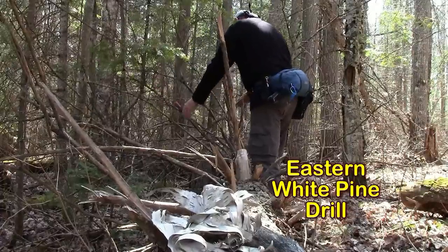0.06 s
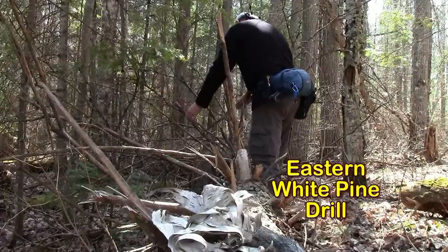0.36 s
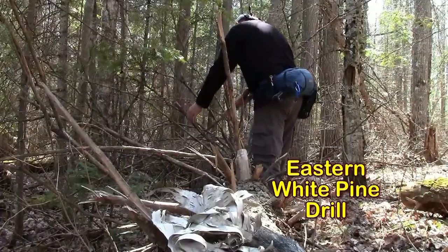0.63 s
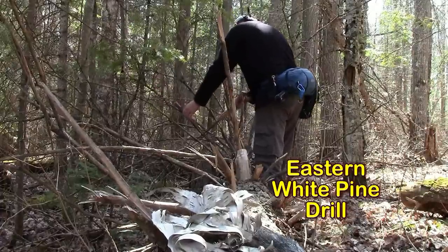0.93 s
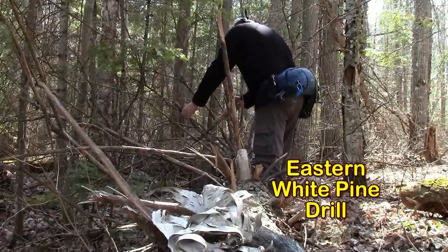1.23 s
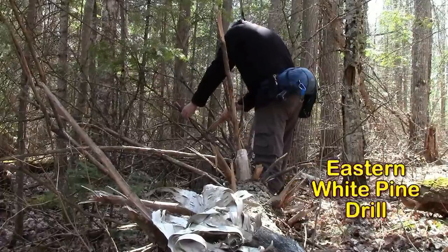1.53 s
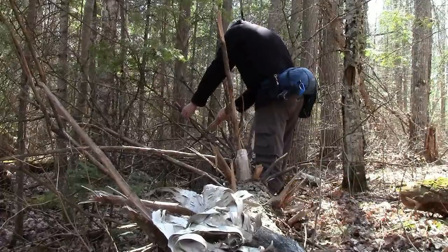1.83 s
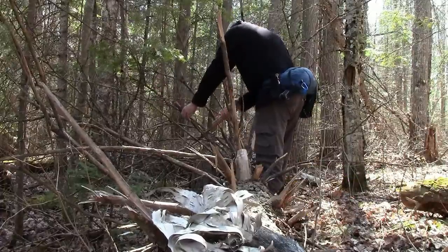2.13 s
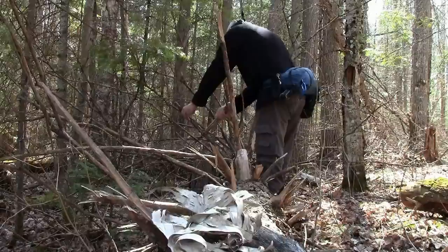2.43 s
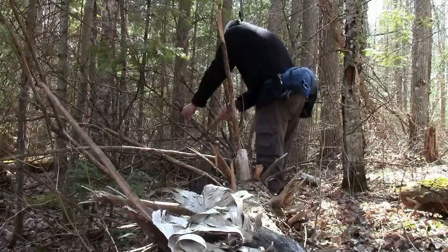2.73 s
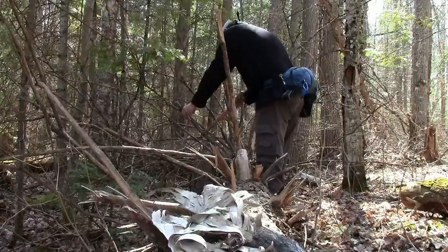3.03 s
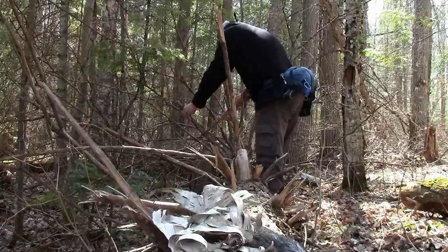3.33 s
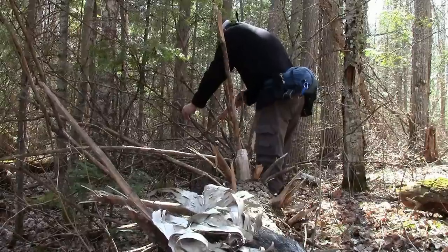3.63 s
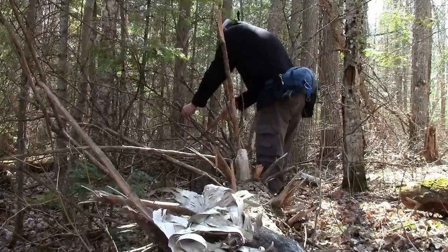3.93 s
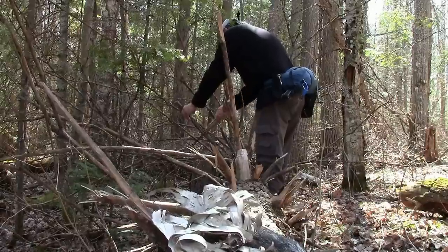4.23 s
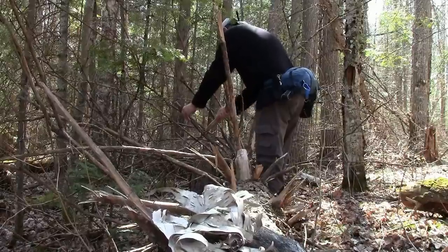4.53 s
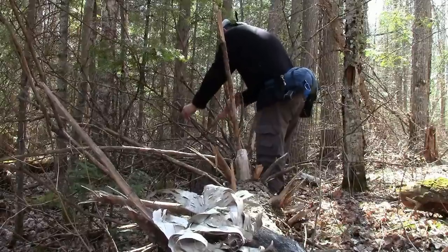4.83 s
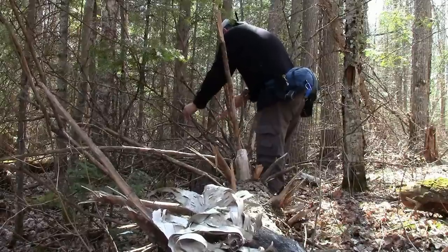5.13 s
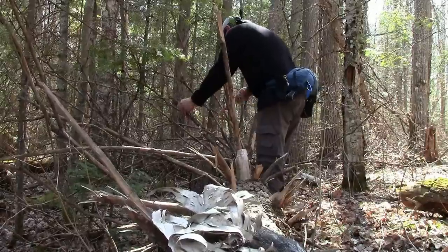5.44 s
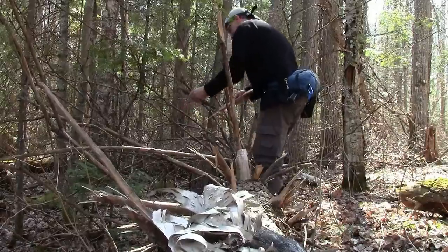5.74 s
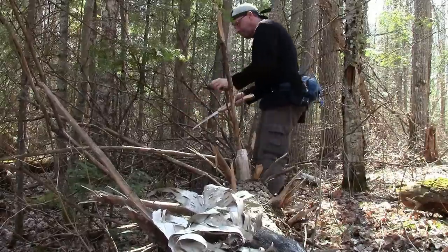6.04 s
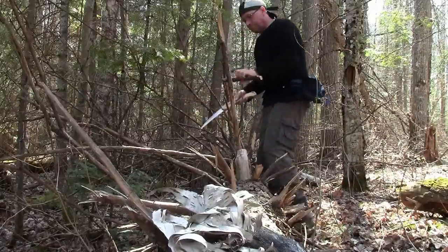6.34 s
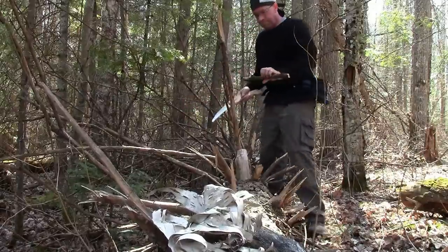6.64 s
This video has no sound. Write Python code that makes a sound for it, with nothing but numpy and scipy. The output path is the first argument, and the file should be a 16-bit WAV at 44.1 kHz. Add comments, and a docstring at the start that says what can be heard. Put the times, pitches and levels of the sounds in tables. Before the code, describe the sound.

In a quiet forest, dry twigs snap and leaves stir as a blade nudges along bark. A hand saw then cuts a dead branch in quick, rasping pulls and pushes that make the wood drum. The last fibres crack sharply and the branch comes off, followed by swishing clothes. It is heard from a few steps away, over a faint hiss and a low breeze on the microphone.

```python
"""A hand saw cuts a dead pine branch in a quiet forest. Its teeth tear the wood in quick pulls and
pushes, which rasp and make the branch drum, until the last fibres crack and the branch comes off.
Before the cut, dry twigs snap and leaves stir as the blade is set in place. Afterwards, clothes
swish as the sawyer straightens up. A faint hiss and a low breeze lie under it all."""
import sys
import numpy as np
from scipy import signal
from scipy.fft import rfft, irfft
from scipy.io import wavfile
from scipy.ndimage import uniform_filter1d

SR = 44100
rng = np.random.default_rng(int(sys.argv[2]) if len(sys.argv) > 2 else 0)


def dump_mix(stems):
    """Bounce the given channels to the path in sys.argv[1] as a 16-bit WAV at rate SR."""
    frames = np.atleast_2d(stems).T  # one column per channel
    limited = np.clip(frames, -1, 1)  # hard clip at full scale
    pcm = np.round(limited * 32767).astype(np.int16)
    wavfile.write(sys.argv[1], SR, pcm)


N = 302967

# Tone of the forest hiss and of the breeze: frequency_hz, level_db
HISS_COLOUR = [(59, -25), (100, 4), (350, 0), (471, 1.5), (1030, -5), (2930, -8.5), (3940, -32),
               (13800, -14), (16000, -27)]
BREEZE_COLOUR = [(8,-24),(22,-4.5),(35,-8.5),(55,-15.5),(90,-28),(160,-47),(400,-58)]
# Gusts on the microphone: loudest_at_s, rise_s, fall_s, level_db
GUSTS = [(.85, .3, 0.31, -40), (2.15, 0.12, 0.76, -43.5), (3.5, .25, 0.71, -41), (4.43, 0.053, 0.17, -44),
         (5.3, .25, 0.26, -39), (6.08, 0.087, 0.064, -46)]
# Dry twigs snapping: start_s, level_db, pitch_hz, fade_s
TWIGS = [(0.017, -16, 1790, 0.05), (0.123, -21, 4250, 0.059), (0.136, -22, 1576, 0.081),
         (0.237, -25, 1330, 0.026), (0.291, -24.5, 1595, 0.059), (0.313, -25, 2240, 0.033),
         (0.472, -32.5, 1430, 0.036), (0.523, -30.5, 1750, 0.024), (0.56, -30, 2630, 0.031),
         (0.644, -30, 4500, 0.055), (0.666, -24, 2450, 0.021), (0.777, -28, 1620, 0.027),
         (0.784, -23, 3380, 0.028), (0.882, -22, 4200, 0.022), (0.935, -22.5, 3430, 0.035),
         (0.982, -24, 3600, 0.054), (0.99, -21.5, 1950, 0.026), (1.018, -22, 4100, 0.069),
         (1.025, -12.5, 2780, 0.016), (1.155, -17, 2026, 0.05), (1.336, -12.5, 1930, 0.06),
         (1.414, -25, 3660, 0.038), (1.424, -24, 1860, 0.025), (1.508, -29.5, 1680, 0.06),
         (1.697, -33, 2900, 0.13), (1.738, -30.5, 4030, 0.016), (1.801, -31, 2740, 0.043),
         (2.005, -11.5, 1960, 0.066), (2.013, -6.5, 3680, 0.01), (5.484, -18, 1560, 0.047),
         (5.638, -20, 2670, 0.022), (5.647, -19.5, 3830, 0.013), (5.718, -30, 1397, 0.032),
         (5.996, -25, 2080, 0.018), (6.6, -26.5, 3930, 0.036)]
# Dull knocks of wood, hand and boot: start_s, level_db, pitch_hz, fade_s
KNOCKS = [(.02,-23,980,0.048),(.045,-26,784,0.025),(.128,-31,466,0.098),(.172,-33,317,0.11),(.245,-26,560,0.027),(2.203,-17.5,230,0.046),(5.438,-18,495,0.055),(6.1224,-18,1495,0.0065)]
# Teeth snagging and fibres breaking: start_s, level_db, pitch_hz, fade_s
CRACKS = [(2.183,-27,2950,0.022),(2.594,-12,4440,0.027),(2.7232,-2.5,2620,0.0068),(3.0593,-1.5,3070,0.014),(3.315,-14.5,2447,0.028),(3.683,-23,2980,.012),(3.695,-15,3430,0.015),(4.023,-32,2790,0.017),(4.374,-16.5,2980,0.018),(4.4595,2.5,3580,0.011),(4.468,-11,2647,0.01),(4.742,-33,2360,0.017),(4.8205,4.5,5056,0.0056),(4.9046,-15,4060,.012),(4.923,-8,4733,0.0059),(5.078,-9,1797,.02),(5.0855,6,2650,0.023),(5.2,3,3020,0.012),(5.2325,-0.5,1700,0.021),(5.239,5,1147,0.035),(5.2485,-2.5,2280,0.013),(5.2763,-5,2650,0.0047),(5.43,-4.5,1185,0.027),(5.442,-2,1158,0.031),(5.5455,-3.5,3640,0.017)]
# Tone of twigs, knocks, cracks and rustling: frequency_hz, level_db
TWIG_COLOUR = [(100,-40),(650,-6),(1150,4),(1800,4.5),(4000,3.5),(7000,-3),(11000,-8),(16000,-23)]
KNOCK_COLOUR = [(80,-6),(300,17),(1800,6),(4000,-23),(14000,-47)]
CRACK_COLOUR = [(100,-76),(500,-6),(1100,13.5),(3500,17),(6000,12.5),(9000,8.5),(12000,1),(16000,-20)]
RUSTLE_COLOUR = [(71, -59), (120, -17), (308, 1), (427, 1), (483, -5.5), (839, 4), (1030, 2), (1750, 6.5),
                 (2430, 2.5), (4140, 3.5), (10800, -10), (14200, -17), (16000, -44)]
# Dry leaves stirring: loudest_at_s, rise_s, fall_s, level_db
LEAF_STIRS = [(.02, 0.11, 0.21, -33), (.55, 0.094, 0.2, -42), (.83, 0.046, 0.13, -40),
              (1.3, 0.16, 0.26, -41.5), (1.85, 0.14, 0.36, -48)]
# Nudges of the blade along the bark: loudest_at_s, rise_s, fall_s, level_db
RUBS = [(1.04, 0.037, 0.036, -38.5), (1.25, 0.1, 0.11, -34.5), (1.73, 0.013, 0.021, -40),
        (2.02, 0.12, 0.032, -45.5)]
# Cutting pulls and lighter pushes: start_s, length_s, fastest_at (0-1), rasp_db, drum_db, chatter_hz
PULLS = [(2.194, 0.17, 0.73, -18.5, -19.5, 281), (2.596, 0.13, 0.37, -17.4, -17.5, 298),
         (2.962, 0.11, 0.63, -16, -14.5, 315), (3.316, 0.13, 0.25, -17.0, -18, 351),
         (3.69, 0.11, 0.81, -17, -17, 345), (4.028, 0.11, 0.76, -15, -18, 397),
         (4.376, 0.107, 0.69, -15.5, -16.5, 425), (4.74, 0.1, 0.43, -15, -17.5, 430),
         (5.079, 0.13, 0.62, -16.5, -18, 411), (5.415, 0.056, 0.2, -22.5, -18, 446.5)]
PUSHES = [(2.437, 0.1, 0.4, -19, -16.5, 376), (2.801, 0.11, 0.79, -21.0, -20.5, 329),
          (3.152, 0.11, 0.36, -20.9, -17.5, 367.4), (3.522, 0.122, 0.27, -23.5, -24.5, 355.7),
          (3.87, 0.107, 0.18, -22.5, -23.5, 363), (4.21, 0.1, 0.75, -21, -28, 389),
          (4.56, 0.126, 0.7, -23, -25.5, 428), (4.921, 0.12, 0.86, -21.3, -23.5, 436),
          (5.239, 0.15, 0.05, -19.1, -19, 372)]
# Tone of the rasp: frequency_hz, level_db
PULL_COLOUR = [(60,-69),(200,3.5),(450,-1),(700,-9),(1000,-0.5),(1500,0.5),(2800,-4.5),(4000,-4.5),(6000,-7),(9000,-12.5),(12000,-16.5),(16000,-30)]
PUSH_COLOUR = [(60,-57),(200,-11.5),(520,8),(700,0),(1000,0),(1500,3),(2800,0),(4000,-2),(6000,-6),(9000,-11),(12000,-17),(16000,-30)]
# Loudness shape of a stroke's rasp and drumming: swell_db, rise_db_per_s, fall_db_per_s, drag_db
PULL_RASP_SHAPE = (5.5, 1150, 637, -58)
PULL_DRUM_SHAPE = (10.5, 1150, 408, -44)
PUSH_RASP_SHAPE = (3.5, 482, 750, -48.5)
PUSH_DRUM_SHAPE = (8.5, 480, 900, -58)
# Rings of wood and blade at the cut: pitch_hz, width_hz, level_db
CUT_RINGS = [(860,43,19),(1090,150,5.5),(1302,35,5),(1515,31,-1),(1970,380,-1),(2320,16,8),(2730,310,7.5),(3540,143,6.5)]
# The deepening cut grows hollower, its two lowest rings louder: time_s, level_db
HOLLOWNESS = [(2.2,-10),(2.7,-1),(3.1,0),(4.5,1),(5.4,-1)]
# Notes of the bending branch: base_pitch_hz, width_hz, pull_db, push_db
BRANCH_NOTES = [(165,18,-17,-20),(211.4,19.5,4,-18.5),(317.5,22,-5,-8),(382.8,16.2,6.5,0.5),(428.6,12.3,-0.5,-12)]
# As the cut deepens, the branch rings higher and loses bass: time_s, pitch_factor, bass_db
BRANCH_TUNING = [(2.2,0.99,3),(3.35,0.97,1),(3.7,1,-4.5),(4.8,1.03,-0.5),(5.16,1.09,-9),(5.35,1.03,-13),(5.44,1.11,-9)]
# Blade squeaks, hollow scrapes and the bright ring of a cracking fibre:
# middle_s, length_s, level_db, pitch_hz, width_hz
BRIEF_NOTES = [(2.295,.035,-28,1910,79.6),(2.474,0.031,-27,3100,300),(2.65,0.068,-31,3390,122),(2.56,0.024,-38,3500,90),(2.904,0.037,-26.5,3564,110),(3.175,0.059,-25.5,930,220),(3.166,0.049,-26.5,630,120),(3.562,0.054,-29,820,240),(3.935,0.046,-34,3630,200),(5.162,0.049,-24,1080,149),(5.199,0.011,-16,3106,400),(5.392,0.035,-36,4900,149.8),(5.436,.05,-16.5,1136,300)]
# Clothes swishing with each move: loudest_at_s, rise_s, fall_s, level_db
SWISHES = [(5.5, 0.046, 0.076, -38), (5.7, .15, .1, -45), (5.81, 0.033, 0.079, -34),
           (5.9, 0.044, 0.061, -33), (6.12, 0.25, 0.27, -38.5), (6.345, 0.069, 0.046, -28),
           (6.45, 0.057, 0.031, -34.5), (6.6, 0.14, 0.15, -40.5), (6.84, 0.1, .2, -29.5)]

TIME_S = np.arange(N) / SR


def amp(db):
    """Turns decibels into a gain."""
    return 10 ** (np.asarray(db) / 20)


def evened(x):
    """Scales a sound to an average (rms) level of 1."""
    return x / np.sqrt(np.mean(x ** 2) + 1e-20)


def steadied(x, size):
    """Holds the level near 1 over stretches of `size` samples."""
    return x / np.sqrt(abs(uniform_filter1d(uniform_filter1d(x ** 2, size), size)) + 1e-12)


def add(mix, start_s, sound):
    """Mixes a sound in at its start time."""
    part = mix[max(round(start_s * SR), 0):][:len(sound)]
    part += sound[:len(part)]


def noise(size=N):
    """Plain white noise."""
    return rng.standard_normal(size)


def colour(x, points, size=4096):
    """Shapes a sound's tone along (frequency_hz, level_db) points."""
    hz, db = np.transpose(points)
    log_hz = np.log(abs(np.fft.fftfreq(size, 1 / SR)) + 1)
    log_gain = np.log(amp(np.interp(log_hz, np.log(hz), db)))
    taps = np.fft.ifft(np.exp(np.conj(signal.hilbert(log_gain)))).real  # no ringing before a hit
    return signal.oaconvolve(x, taps)[:len(x)]


def resonate(x, hz, width_hz):
    """Makes a sound ring at a pitch that may glide; a narrower width rings longer."""
    turn = np.exp(2j * np.pi * np.cumsum(hz * np.ones(len(x))) / SR)
    decay = np.exp(-np.pi * abs(width_hz) / SR)
    return 2 * (turn * signal.lfilter([1 - decay], [1, -decay], x / turn + 1e-18)).real


def sing(x, hz, width_hz):
    """Rings a sound twice for a purer note."""
    return resonate(resonate(x, hz, width_hz), hz, width_hz)


def grains(per_s, spread_db):
    """Random clicks, mostly small and a few large."""
    size = amp(spread_db * np.minimum(rng.exponential(1, N), 4))
    return evened(size * rng.choice([-1, 1], N) * (rng.random(N) < per_s / SR))


def swells(rows):
    """Smooth humps of loudness, each 6 dB down one rise before and one fall after its top."""
    power = 0
    for top_s, rise_s, fall_s, db in rows:
        distance = (TIME_S - top_s) / np.where(TIME_S < top_s, rise_s, fall_s)
        power += amp(db - 6 * np.minimum(distance ** 2, 10)) ** 2
    return np.sqrt(power)


def air():
    """The forest hisses faintly and a breeze rumbles on the microphone."""
    hiss = amp(-53.5) * evened(colour(noise(), HISS_COLOUR))
    breeze = evened(colour(noise(), BREEZE_COLOUR, size=16384))
    return hiss + np.hypot(amp(-50.5), swells(GUSTS)) * breeze


def leaves():
    """Dry leaves crackle in many tiny clicks as they stir."""
    crackle = colour(grains(per_s=1500, spread_db=4) + .6 * noise(), RUSTLE_COLOUR)
    crisp = colour(crackle, [(300, 4.6), (800, 3.7), (2000, 1.8), (6000, 3.7), (13000, 4.7)])
    return amp(-2.5) * swells(LEAF_STIRS) * evened(crisp)


def snaps(rows, tone, ring_db, ring_hold, overtone_db, tail_db, travel_s, size=6144):
    """Each break or knock is a dying burst that rings two notes; wood carries the treble fastest."""
    out, t = np.zeros(N), np.arange(size) / SR
    travel = np.exp(-4j * np.pi * travel_s * np.sqrt(1000 * np.fft.rfftfreq(size, 1 / SR)))
    for start_s, db, hz, fade_s in rows:
        fall_db = -60 * t / fade_s
        burst = noise(size) * (amp(fall_db) + amp(tail_db - 500 * t))
        ring = np.sin(2 * np.pi * hz * t) * amp(fall_db / ring_hold)
        ring += amp(overtone_db + fall_db) * np.sin(2 * np.pi * hz * rng.uniform(1.5, 2.05) * t)
        sound = evened(colour(burst, tone)) + amp(ring_db) * evened(ring)
        sound = irfft(rfft(sound) * travel, size)
        peak = 2 * np.sqrt(uniform_filter1d(sound ** 2, size=100).max())
        add(out, start_s, amp(db) * sound / peak)
    return out


def twigs(small_count=10):
    """Dry twigs snap; extra small ones give way at random while the blade is placed."""
    when, size, pitch = rng.random((small_count, 3)).T
    starts_s = np.interp((np.arange(small_count) + when) / small_count, [0, 1], [0.2, 1.48])
    levels_db = np.interp(size, [0, 1], [-24, -32])
    pitches_hz = np.interp(pitch, [0, 1], [1917, 4420])
    small = [(s, db, hz, 0.031) for s, db, hz in zip(starts_s, levels_db, pitches_hz)]
    return amp(0.5) * snaps(TWIGS + small, TWIG_COLOUR, ring_db=-1.5, ring_hold=1.3,
                            overtone_db=-4, tail_db=-17, travel_s=.0013)


def knocks():
    """Wood, hand and boot bump with a short, dull ring."""
    return snaps(KNOCKS, KNOCK_COLOUR, ring_db=4, ring_hold=1.4,
                 overtone_db=-10, tail_db=-28, travel_s=.000757)


def bark_rub():
    """The blade slips along the bark, waking mainly one note of the branch."""
    slips = grains(per_s=400, spread_db=5.3)
    hum = evened(sing(slips, hz=377, width_hz=65))
    scuff = evened(colour(slips, [(100, -29), (180, 9.5), (480, -0.5), (900, -11), (4000, -45)]))
    return amp(-0.5) * swells(RUBS) * steadied(hum + amp(-4) * scuff, size=1500)


def cracks():
    """Teeth snag and fibres break with sharp, bright clicks."""
    return snaps(CRACKS, CRACK_COLOUR, ring_db=0, ring_hold=0.8,
                 overtone_db=-7.5, tail_db=-51, travel_s=.00072)


def motion(start_s, length_s, fastest_at):
    """The blade speeds up, then slows: gives its progress and speed in one stroke, both 0-1."""
    along = np.clip((TIME_S - start_s) / length_s, 0, 1)
    return along, np.sin(np.pi * np.interp(along, [0, fastest_at, 1], [0, .5, 1]))


def teeth(strokes, catches_per_s, uneven_db, tear_s, scrape):
    """Teeth catch more often as the blade speeds up; each catch tears a short burst of fibres."""
    rate = catches_per_s * (.5 + .5 * sum(motion(*row[:3])[1] for row in strokes))
    slip = evened(uniform_filter1d(noise(), 90))
    teeth_passed = np.floor(np.cumsum(rate * np.exp(.25 * slip)) / SR)
    catches = (np.diff(teeth_passed, prepend=0) > 0) * amp(uneven_db * np.clip(noise(), -2, 2))
    tearing = signal.lfilter([1], [1, -np.exp(-1 / (tear_s * SR))], catches)
    return 0.5 * evened(catches) + evened(tearing * noise()) + scrape * noise()


def ripple(x, depth_db):
    """The contact point moves, so the rings of wood and blade come and go in short patches."""
    spectrum = signal.stft(x, nperseg=1024, noverlap=768)[2]
    patches = uniform_filter1d(noise(spectrum.shape), 6, axis=0)  # smooth across pitch
    patches = evened(uniform_filter1d(patches, 4, axis=1))  # then across time
    reach = np.interp(np.fft.rfftfreq(1024, 1 / SR), [4000, 8000], [1, .45])  # steadier treble
    spectrum *= amp(depth_db * reach[:, None] * patches)
    return signal.istft(spectrum, nperseg=1024, noverlap=768)[1][:len(x)]


def rasp(blows, tone, ring_db, patchy_db):
    """Tooth blows rasp in the cut and set wood and blade ringing."""
    rings = [amp(db) * resonate(blows, hz, width) for hz, width, db in CUT_RINGS]
    hollowness = amp(np.interp(TIME_S, *np.transpose(HOLLOWNESS)))
    ringing = hollowness * sum(rings[:2]) + sum(rings[2:])
    return steadied(ripple(colour(blows + amp(ring_db) * ringing, tone), patchy_db), size=900)


def chatter(blows, strokes, sag=0.11, climb=0.11):
    """The blade chatters at a pitch that sags when it is slow and climbs along each stroke."""
    pitch_hz = np.full(N, float(strokes[0][5]))
    for start_s, length_s, fastest_at, _, _, hz in strokes:
        along, speed = motion(start_s, length_s, fastest_at)
        bend = 1 - sag * (1 - speed) + climb * (along - fastest_at)
        pitch_hz = np.where(TIME_S > start_s - length_s / 2, hz * bend, pitch_hz)
    return evened(sing(blows, pitch_hz, width_hz=54))


def drumming(blows, strokes, note_column, chatter_db):
    """Tooth blows shake the branch, whose low notes join the blade's chatter."""
    times_s, factors, bass_db = np.transpose(BRANCH_TUNING)
    tuning = np.interp(TIME_S, times_s, factors)
    bass = amp(np.interp(TIME_S, times_s, bass_db))
    notes = [amp(row[note_column]) * resonate(blows, row[0] * tuning, row[1]) for row in BRANCH_NOTES]
    band = signal.butter(3, [160, 680], "band", fs=SR, output="sos")
    branch = evened(signal.sosfilt(band, bass * sum(notes[:2]) + sum(notes[2:])))
    return steadied(branch + amp(chatter_db) * chatter(blows, strokes), size=1100)


def effort(strokes, shape, level_column):
    """Each stroke bites, grows louder with speed and lets go; between strokes the blade drags."""
    swell_db, rise_db_per_s, fall_db_per_s, drag_db = shape
    sawing = (TIME_S > strokes[0][0]) & (TIME_S < strokes[-1][0] + strokes[-1][1])
    power = amp(drag_db) ** 2 * sawing
    for row in strokes:
        start_s, length_s, fastest_at = row[:3]
        _, speed = motion(start_s, length_s, fastest_at)
        edges_db = rise_db_per_s * np.maximum(start_s - TIME_S, 0)
        edges_db += fall_db_per_s * np.maximum(TIME_S - start_s - length_s, 0)
        power += amp(row[level_column] - swell_db * (1 - speed) - np.minimum(edges_db, 100)) ** 2
    return np.sqrt(power)


def wood_grain(depth_db):
    """Uneven grain in the wood makes the loudness waver."""
    return amp(depth_db * evened(uniform_filter1d(uniform_filter1d(noise(), 600), 300)))


def saw_pulls(blows):
    """On the cutting stroke, the same tooth blows drive both rasp and drumming."""
    bite = rasp(blows, PULL_COLOUR, ring_db=0.5, patchy_db=2)
    bite *= effort(PULLS, PULL_RASP_SHAPE, level_column=3)
    drum = drumming(blows, PULLS, note_column=2, chatter_db=-6)
    drum *= effort(PULLS, PULL_DRUM_SHAPE, level_column=4)
    return wood_grain(depth_db=1.07) * (bite + amp(1.7) * drum)


def saw_pushes(blows):
    """On the lighter return stroke, the tooth blows make the cut ring less."""
    bite = rasp(blows, PUSH_COLOUR, ring_db=-8.5, patchy_db=4)
    bite *= effort(PUSHES, PUSH_RASP_SHAPE, level_column=3)
    drum = drumming(blows, PUSHES, note_column=3, chatter_db=-4)
    drum *= effort(PUSHES, PUSH_DRUM_SHAPE, level_column=4)
    return wood_grain(depth_db=1.32) * (amp(-0.3) * bite + amp(-1.6) * drum)


def brief_notes():
    """A blade squeak, hollow scrape or cracking fibre rings briefly around one pitch."""
    out = np.zeros(N)
    for middle_s, length_s, db, hz, width_hz in BRIEF_NOTES:
        swell = np.hanning(int(length_s * SR))
        tone = sing(noise(SR // 4), hz, width_hz)[-len(swell):]
        add(out, middle_s - length_s / 2, amp(db) * evened(tone * swell))
    return out


def clothes():
    """Cloth rustles more smoothly than leaves and fizzes more as it moves faster."""
    fibres = grains(per_s=5000, spread_db=2.7) + 1.1 * noise()
    cloth = evened(colour(fibres, RUSTLE_COLOUR))
    fizz = evened(colour(noise(), [(1000, -14), (4000, -1), (7000, 2), (11000, -3), (16000, -19)]))
    moves = swells(SWISHES)
    return moves * (cloth + amp(-4.5) * moves / moves.max() * fizz)


def forest_echoes(x, near_db, near_fade_s, far_db, far_fade_s):
    """The ground and near trunks scatter the sound at once, far trunks faintly and later."""
    t = np.arange(SR // 2) / SR
    bounces = noise(len(t)) * (rng.random(len(t)) < 2000 / SR) * (t > .003)
    near = bounces * amp(-60 * t / near_fade_s)
    far = bounces[::-1] * amp(-60 * t / far_fade_s) * (t > .02)
    echoes = amp(near_db) * near / np.linalg.norm(near) + amp(far_db) * far / np.linalg.norm(far)
    tone = [(100, -2.5), (1000, -0.5), (3500, -1.5), (12000, 2.5)]
    return colour(signal.oaconvolve(x, echoes)[:N], tone)


def scene():
    """All the sounds at the branch, heard through the trees from a few steps away."""
    pull_blows = teeth(PULLS, catches_per_s=700, uneven_db=3.1, tear_s=.0006, scrape=.5)
    push_blows = teeth(PUSHES, catches_per_s=850, uneven_db=2.6, tear_s=.0009, scrape=.7)
    sawing = saw_pulls(pull_blows) + saw_pushes(push_blows)
    hits = cracks() + twigs() + knocks()
    direct = sawing + hits + brief_notes() + bark_rub() + leaves() + clothes()
    echoes = forest_echoes(direct, near_db=-11, near_fade_s=0.067, far_db=-23.5, far_fade_s=1.0)
    return (direct + echoes + air())[None]


def record(dry):
    """The loudest cracks overload and clip; then the very highest treble is cut away."""
    treble_cut = signal.firwin(401, 16100, window=("kaiser", 8), fs=SR)
    return signal.oaconvolve(np.clip(dry, -1, 1), treble_cut[None], "same")


dry = scene()
out = record(dry)
dump_mix(out)
```